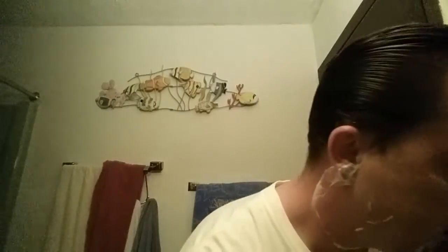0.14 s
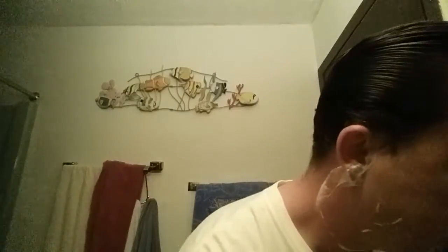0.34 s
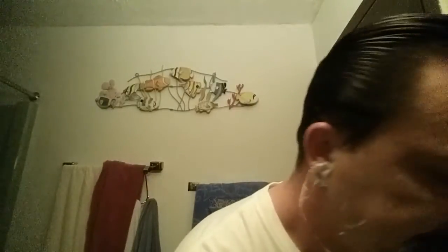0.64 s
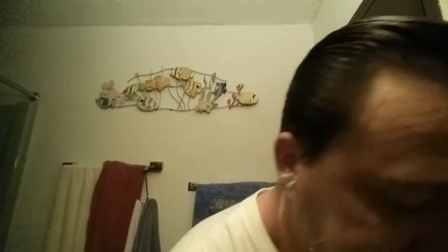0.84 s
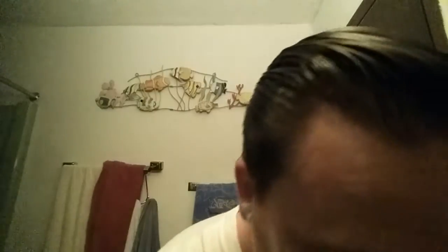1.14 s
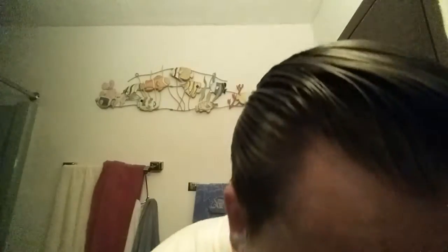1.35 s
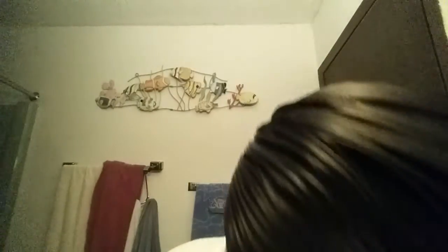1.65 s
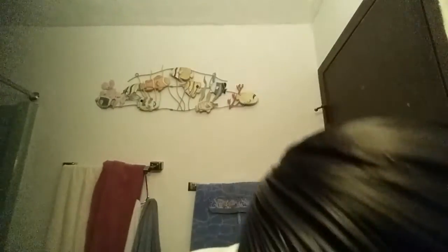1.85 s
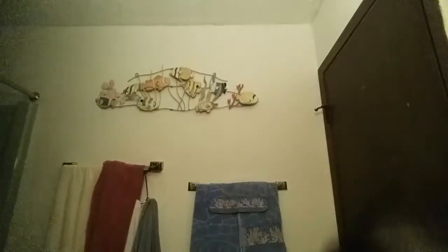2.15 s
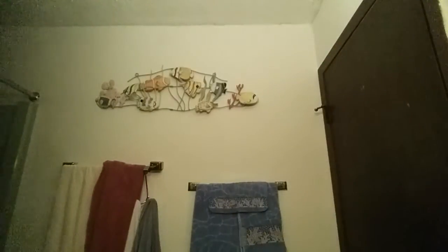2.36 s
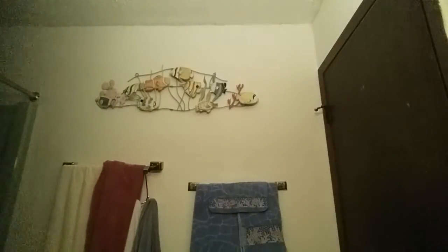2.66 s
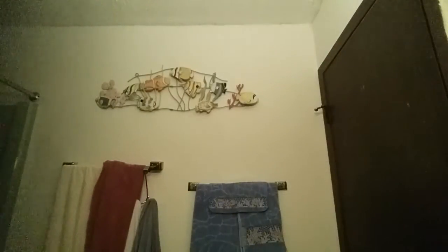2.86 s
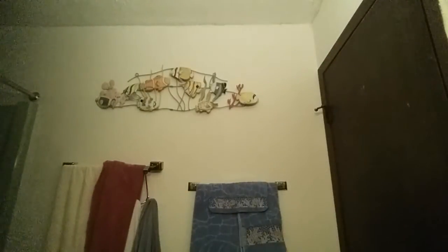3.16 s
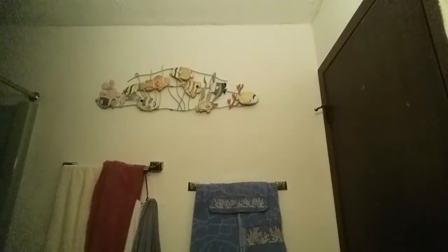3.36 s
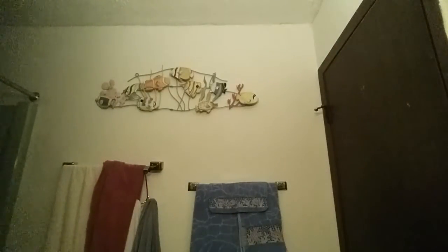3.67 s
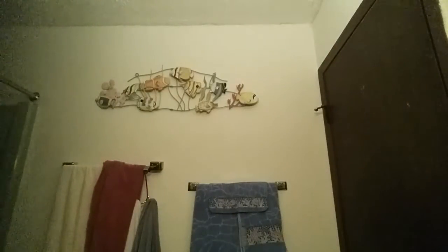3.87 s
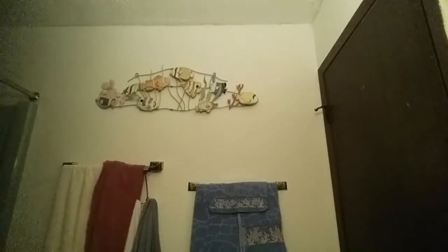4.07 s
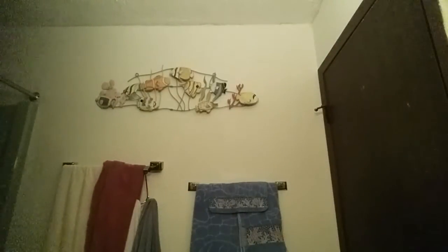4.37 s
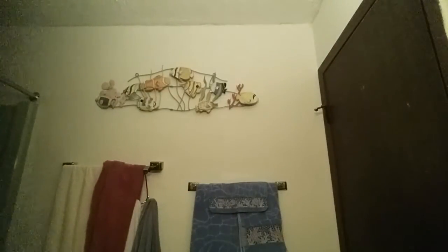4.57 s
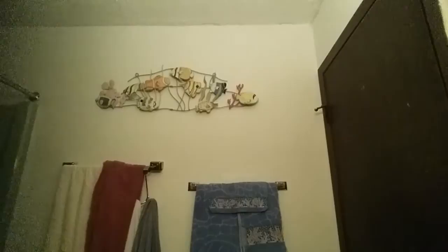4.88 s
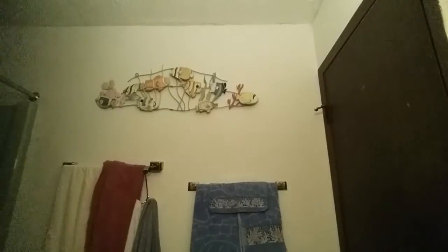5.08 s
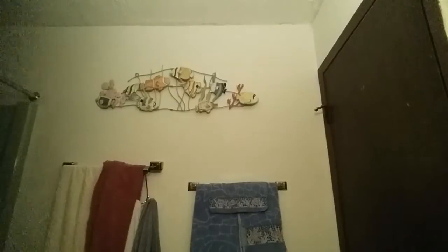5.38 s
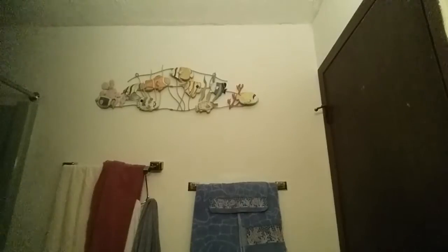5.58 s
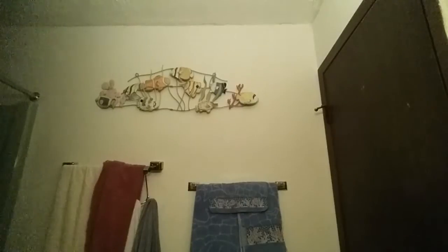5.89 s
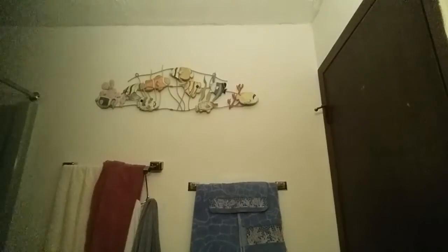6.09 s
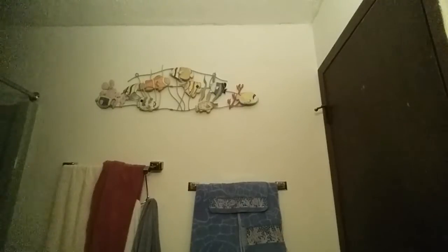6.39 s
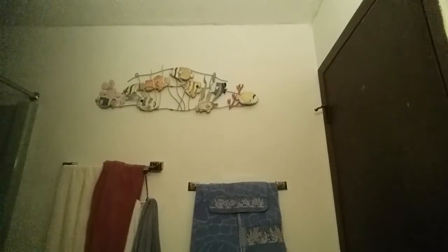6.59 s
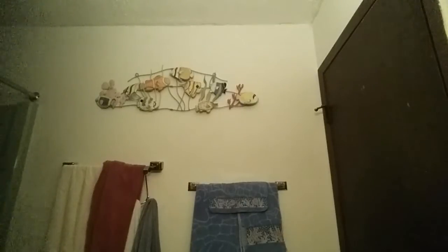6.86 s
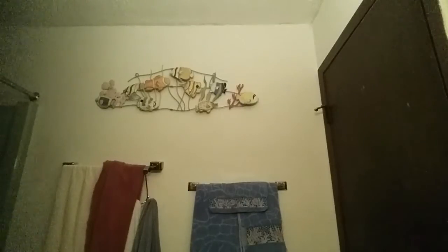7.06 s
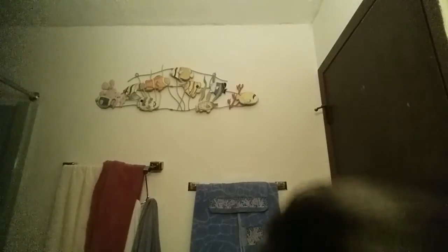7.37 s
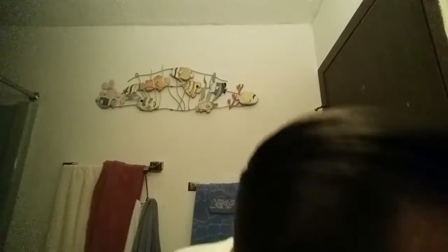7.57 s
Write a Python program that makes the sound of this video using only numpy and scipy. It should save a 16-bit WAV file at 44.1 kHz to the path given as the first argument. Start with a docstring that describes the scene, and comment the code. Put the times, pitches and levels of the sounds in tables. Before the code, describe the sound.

In a small tiled bathroom an extractor fan drones low and steadily. A thin tap hisses for the first second with small plops, then a razor raps sharply on the ceramic basin and rattles, the tap stops, and water splashes in quick bursts. A quiet gap, another short splash with a deep plop, sparse drips, and a final splash. Close stereo phone microphones, short bright echo.

```python
"""Rinsing a razor in a small tiled bathroom

An extractor fan drones in the room's standing waves: noise through narrow resonances, under a thin air rush.
A thin tap hisses until it is shut; a razor is knocked on the basin, rings and bounces: noise bursts and
damped sines. Water sloshes and splashes in the sink, bubbles plop and drops tick: noise and sines of climbing
pitch. All but the fan get a short bright echo of noise; two microphones at the ends of a phone hear it."""
import sys
import numpy as np
from scipy import signal
from scipy.fft import rfft, irfft, next_fast_len
from scipy.io import wavfile
from scipy.ndimage import map_coordinates

SR = 44100
rng = np.random.default_rng(int(sys.argv[2]) if len(sys.argv) > 2 else 0)


def unload_audio(sound):
    """Save the sound as a 16-bit wav file, at the path given as the first command line argument."""
    columns = np.transpose(np.atleast_2d(sound))
    # keep every value between -1 and 1, then stretch to whole-number steps
    steps = np.round(np.clip(columns, -1, 1) * 32767)
    wavfile.write(sys.argv[1], SR, steps.astype(np.int16))


def decibels_to_gain(level_db):
    """Convert a level in decibels to a linear amplitude gain (20 dB per decade)."""
    exponent = np.asarray(level_db, float) / 20
    return 10 ** exponent


N = 340893


def unit(x):
    """Scaled to rms 1."""
    return x / np.sqrt(np.mean(x ** 2) + 1e-20)


def along(points, hz):
    """(Hz, value) points read on a log frequency axis."""
    f, v = np.transpose(points)
    return np.interp(np.log(hz + 1), np.log(f + 1), v)


def wobble(rate):
    """A smooth random curve, rate knots a second."""
    knots = rng.standard_normal(int(N * rate / SR) + 4)
    return map_coordinates(knots, [np.arange(N) * rate / SR])


def filtered(x, response):
    """x through a complex response of frequency."""
    m = next_fast_len(N + SR // 2)
    return irfft(rfft(x, m) * response(np.fft.rfftfreq(m, 1 / SR)), m)[..., :N]


def resonance(f, hz, width_hz):
    """Causal response of one resonance, 1 at its top."""
    return 1j * f * width_hz / (hz * hz - f * f + 1j * f * width_hz)


def stereo(pair):
    """Two unrelated noises mixed to the likeness of the two microphones: the lower the pitch, the more alike."""
    # correlation between the microphones: f/Hz, likeness (1 = same, negative = opposed)
    likeness = [(40, 0.97), (100, 1), (300, 0.83), (500, 0.51), (750, -0.14), (1200, -0.13), (2000, -0.069)]

    def mid_side_gains(f):
        angle = np.arccos(np.clip(along(likeness, f), -1, 1)) / 2
        return np.array([np.cos(angle), np.sin(angle)])

    mid, side = filtered(pair, mid_side_gains)
    return np.array([mid + side, mid - side])


def bubbles(s, db, hz, cycles, rise):
    """Damped sines whose pitch climbs as each bubble nears the surface."""
    t = np.arange(SR // 25) / SR
    age = t * (hz / cycles)[:, None]  # in decay times, each of this many cycles
    cycles = np.reshape(cycles, (-1, 1))
    phase = 2 * np.pi * cycles * (age + rise * age ** 2 / 2)
    envelope = np.exp(-age) * (1 - np.exp(-age * cycles * 0.89))
    rows = decibels_to_gain(db)[:, None] * envelope * np.sin(phase)
    at = np.round(s * SR).astype(int)[:, None] + np.arange(len(t))
    return np.bincount(at.ravel(), rows.ravel(), N + SR)[:N]


def fan():
    """Turbulent air drives each standing wave on its own; a low rumble lies below, a thin rush and hiss above."""
    # standing waves: f/Hz, width/Hz, left level/dB, right level/dB, polarity of the right microphone
    room_modes = [(95.2, 26.4, -42, -77, 1), (108.3, 10.2, -45, -34, -1), (130, 13.4, -43, -40.5, 1),
                  (172.8, 11.2, -40, -43, -1), (199, 13.7, -41, -44.5, -1), (220, 13.1, -44, -64.5, 1),
                  (251, 22.5, -62, -48, 1), (287.9, 40.3, -51.5, -45.5, 1), (330.8, 17.5, -48.5, -50, 1),
                  (392.7, 15, -51.5, -55.5, 1), (437.7, 22.4, -69, -54, 1), (481.6, 11.9, -57, -59.5, 1),
                  (514.6, 59, -57.5, -63, 1)]
    # air rush and hiss: f/Hz, relative level/dB per Hz
    air_spectrum = [(330, -56), (560, -3.5), (809, -5), (878, -7), (1030, -13), (1410, -23), (2250, -19.5),
                    (2680, -27.5), (5750, -32.5), (9640, -37.5), (12100, -27.5), (14500, -29)]
    drone = np.zeros((2, N))
    for hz, width_hz, left_db, right_db, sign in room_modes:
        mode = lambda f: resonance(f, hz, width_hz) * resonance(f, hz, 3 * width_hz)
        wave = unit(filtered(rng.standard_normal(N), mode))
        drone += decibels_to_gain([[left_db], [right_db]]) * [[1], [np.sign(sign)]] * wave
    rumble = unit(filtered(rng.standard_normal(N), lambda f: resonance(f, 30, 50) ** 2))
    air = filtered(rng.standard_normal((2, N)), lambda f: decibels_to_gain(along(air_spectrum, f)))
    air_level = decibels_to_gain(-61 + 0.43 * wobble(3.28))
    return drone + decibels_to_gain(-51.0) * rumble + air_level * unit(stereo(air))


def tap():
    """The thin stream hisses in the resonances of spout and basin until the tap is shut."""
    # resonances of spout and basin: f/Hz, width/Hz, relative level/dB
    spout_modes = [(1300, 126, 6.5), (2150, 360, -1), (2750, 190, 1), (3400, 2500, -8), (860, 75, 3)]
    level_db, shut_s = -64, 1.05

    def spout(f):
        total = 0
        for k, (hz, width_hz, db) in enumerate(sorted(spout_modes)):
            total = total + (-1) ** k * decibels_to_gain(db) * resonance(f, hz, width_hz)  # neighbours alternate in sign
        return total

    turbulence = rng.standard_normal(N) * decibels_to_gain(1.7 * wobble(58.7))
    stream = unit(filtered(turbulence, spout))
    waver = decibels_to_gain(1.5 * wobble(6))
    return decibels_to_gain(level_db) * waver * stream * (np.arange(N) / SR < shut_s)


def splashes(s, hold_s, db, fall_db_per_s):
    """Level curve: each splash rises fast, holds, falls away and leaves a trickle; their powers add."""
    rise_s, trickle_db, trickle_fall_db_per_s = 0.0024, -23, 10.5
    hop = 32  # samples between points of the curve
    age = np.arange(0, N + hop, hop) / SR - s[:, None]
    over = np.maximum(age - hold_s[:, None], 0)
    shape = decibels_to_gain(-fall_db_per_s * over) + decibels_to_gain(trickle_db - trickle_fall_db_per_s * over)
    gain = decibels_to_gain(db)[:, None] * np.clip(age / rise_s, 0, 1) * shape
    return np.interp(np.arange(N) / hop, np.arange(gain.shape[1]), np.linalg.norm(gain, axis=0))


def water():
    """Slosh is noise full of random bubbles, spray is hiss made of tiny impacts; both come in quick gushes."""
    # splashes of the rinsing hand and water shaken off the razor:
    # t/s, hold/s, slosh level/dB, spray level/dB
    splash_list = [(0.045, 0.053, -60, -67.5), (0.262, 0.028, -81, -61.5), (0.572, 0.052, -57, -62),
                   (1.105, 0.017, -45, -51.5), (1.544, 0.0095, -48.5, -56), (1.65, 0.018, -62, -63),
                   (1.68, 0.018, -51.5, -54), (1.767, 0.024, -68, -57), (1.796, 0.035, -51, -48),
                   (1.904, 0.024, -59, -58), (1.98, 0.093, -61.5, -64), (2.096, 0.049, -54.5, -53.5),
                   (2.212, 0.15, -58.5, -57), (2.334, 0.035, -56.5, -54.5), (2.446, 0.028, -56.5, -62),
                   (2.482, 0.0088, -56.5, -50.5), (4.524, 0.052, -53, -52), (4.547, 0.042, -58, -49.5),
                   (4.68, 0.021, -64, -59), (4.822, 0.047, -62, -60.5), (4.904, 0.014, -58.5, -61.5),
                   (5.038, 0.065, -73, -66), (7.512, 0.013, -54, -51), (7.533, 0.011, -60, -47),
                   (7.694, 0.037, -64, -53.5)]
    # spectrum of the wash: f/Hz, relative level/dB per Hz
    slosh_spectrum = [(350, -23), (600, -13), (721, 8), (1170, -2.5), (1680, -13), (1850, 4.5), (6000, -43),
                      (7800, -51), (13200, -120)]
    # spectrum of the spray: f/Hz, relative level/dB per Hz
    spray_spectrum = [(2500, -24), (3500, -2.5), (5570, -3.5), (6770, -0.5), (10000, -4.5), (12300, 0),
                      (14500, -4)]
    s, hold_s, slosh_db, spray_db = np.transpose(splash_list)

    count = 5000
    when = rng.random(count) * N / SR
    size = rng.exponential(1, count)
    pitch = rng.standard_normal(count)
    fizz = unit(bubbles(when, 3.3 * size, 2300 * np.exp(.45 * pitch), cycles=4.5, rise=.1))
    wash = unit(filtered(rng.standard_normal(N), lambda f: decibels_to_gain(along(slosh_spectrum, f))))
    gushes = decibels_to_gain(2.8 * wobble(60))
    slosh = unit(gushes * (0.5 * wash + 0.96 * fizz))

    impacts = rng.standard_normal(N) * decibels_to_gain(5 * wobble(400) + 1.5 * wobble(50))
    spray = unit(filtered(impacts, lambda f: decibels_to_gain(along(spray_spectrum, f))))
    slosh_level = splashes(s, hold_s, slosh_db, fall_db_per_s=182)
    spray_level = splashes(s, hold_s, spray_db, fall_db_per_s=265)
    return slosh_level * slosh + spray_level * spray


def drops():
    """A drop's bubble rings and a second one follows; spatters are short puffs of noise around their pitch."""
    # single bubbles and drips: t/s, level/dB, f/Hz
    plops = [(.0508, -41, 3430), (.085, -44, 1005), (.105, -43, 1020), (.125, -38, 725), (.175, -32.5, 780),
             (0.2665, -39.5, 3270), (1.534, -47, 1700), (1.548, -32, 843), (1.549, -35.5, 2640),
             (1.597, -31.5, 1820), (1.608, -32, 740), (1.632, -42, 1600), (1.738, -39.5, 813),
             (1.79, -35.5, 1900), (1.828, -41, 2150), (1.879, -34.5, 2730), (1.912, -40, 1860),
             (2.068, -43.5, 1530), (2.102, -34, 2750), (2.145, -30, 1820), (2.217, -44, 815),
             (2.274, -32, 2140), (2.299, -37, 703), (2.3321, -33.5, 3290), (2.352, -37, 2200),
             (2.415, -45.5, 1685), (2.477, -37, 2020), (2.4838, -38, 2900), (2.57, -43, 867),
             (3.6388, -54.5, 1670), (3.7334, -51.5, 3200), (4.1011, -54, 4000), (4.527, -40.5, 905),
             (4.5523, -29, 3550), (4.569, -39.5, 2100), (4.612, -23.5, 687), (4.7057, -37.5, 3900),
             (4.777, -46.5, 1210), (4.784, -42, 3400), (4.797, -42.5, 3000), (4.849, -36.5, 2070),
             (4.849, -37, 1560), (5.0678, -42, 4100), (5.521, -51, 1700), (5.7005, -58, 3900),
             (6.609, -42, 1880), (6.715, -55.5, 1920), (7.541, -38, 2060), (7.662, -38, 2190),
             (7.708, -33, 3300), (7.708, -24.5, 2420)]
    # small bright spatters: t/s, level/dB, f/Hz
    ticks = [(0.144, -47.5, 12300), (1.467, -55, 4470), (1.694, -36, 6460), (1.717, -43, 12400),
             (2.1169, -40, 8400), (2.4014, -43, 12100), (3.075, -46.5, 8100), (3.225, -54.5, 12900),
             (4.387, -52, 12400), (5.135, -46.5, 12700), (6.468, -52.5, 11900), (6.547, -51, 12500),
             (6.5975, -48.5, 12200), (7.512, -38.5, 12300)]
    second_db, latest_s = -7, .018  # the bubble that follows each plop
    s, db, hz = np.transpose(plops)
    late, higher = rng.random((len(s), 2)).T
    ring = bubbles(s, db, hz, cycles=5.5 * np.minimum(1, 2400 / hz), rise=0.05)
    second_hz = hz * (0.95 + 0.2 * higher)
    second = bubbles(s + latest_s * late, db + second_db, second_hz, cycles=4.5, rise=0.08)
    sound = np.pad(ring + second, (0, SR))

    t = np.arange(SR // 20) / SR
    f = np.fft.rfftfreq(len(t), 1 / SR)
    for s, db, hz in ticks:
        colour = 0.11 + resonance(f, hz, 0.093 * hz)
        puff = irfft(rfft(rng.standard_normal(len(t))) * colour, len(t))
        sound[round(s * SR):][:len(t)] += decibels_to_gain(db - 60 * t / 0.017) * unit(puff)  # 60 dB down in 17 ms
    return sound[:N]


def razor():
    """Each blow cracks on the ceramic and leaves loose parts rattling; returns these and the blows' duller body."""
    # blows on the basin: t/s, crack level/dB, rattle level/dB, thud level/dB, thud f/Hz
    knocks = [(0.619, -40, -56, -33, 310), (0.802, -33, -46, -16.5, 130), (.832, -13.5, -64, -19, 303),
              (0.852, -7, -38, -17.5, 240), (1.0994, -7, -27.5, -19.5, 272), (1.1437, -17, -42, -29, 250),
              (1.843, -27, -54, -20, 365), (1.862, -45, -73, -29, 330)]
    # the razor head bounces to rest: t/s, level/dB
    bounces = [(1.1438, -26), (1.1722, -29), (1.192, -32)]
    # a hard blow sets the blade ringing: t/s, level/dB, f/Hz, t60/s
    blade = (1.102, -50, 13362, 0.5)
    # ceramic clack: f/Hz, gain/dB
    basin_spectrum = [(290, 8), (500, 8.5), (997, -3), (1850, -8.5), (2050, -6), (2600, -9.5),
                      (5970, -19.5), (13700, -20.5), (14500, -34)]
    clack, body = np.zeros((2, N + SR))
    t = np.arange(SR // 2) / SR
    chatter = decibels_to_gain(5 * wobble(250))
    for s, crack_db, rattle_db, thud_db, hz in knocks:
        at = round(s * SR)
        crack = decibels_to_gain(crack_db - 60 * t / .003)
        rattle = decibels_to_gain(rattle_db - 60 * (t / 0.29) ** 1.46) * chatter[at:at + len(t)]  # settles ever faster
        clack[at:][:len(t)] += (crack + rattle) * rng.standard_normal(len(t))
        envelope = np.exp(-t * hz / 0.98) * (1 - np.exp(-t / 0.00011))
        thud = decibels_to_gain(thud_db) * envelope * np.sin(2 * np.pi * hz * t)  # the counter booms
        body[at:][:len(t)] += thud
    for s, db in bounces:
        body[round(s * SR):][:len(t)] += decibels_to_gain(db - 60 * t / .005) * np.sin(2 * np.pi * 4700 * t)
    s, db, hz, t60 = blade
    body[round(s * SR):][:len(t)] += decibels_to_gain(db - 60 * t / t60) * np.sin(2 * np.pi * hz * t)
    return filtered(clack[:N], lambda f: decibels_to_gain(along(basin_spectrum, f))), body[:N]


def tiles(x, wet_db, bowl_db):
    """Direct sound, the bowl's quick answer and the tiles' echo; sources move, so each piece gets a new tail."""
    # echo of the tiled room: f/Hz, t60/s
    tile_decay = [(150, 0.54), (400, 0.78), (700, 0.2), (2000, 0.42), (5000, 0.28), (12000, 0.36)]
    bowl_t60_s = 0.041
    step, gap = SR // 5, 40  # samples: length of a piece, delay of the echo
    out = np.zeros((2, N + SR))
    for at in range(0, N, step):
        piece = x[at:at + step]
        if not piece.any():
            continue
        hz, t, z = signal.stft(rng.standard_normal((2, SR // 2)), SR, nperseg=256)
        decay = decibels_to_gain(-60 * t / along(tile_decay, hz)[:, None]) + decibels_to_gain(bowl_db - 60 * t / bowl_t60_s)
        tail = signal.istft(z * decay, SR, nperseg=256)[1]
        echo = signal.fftconvolve(piece[None], tail / np.linalg.norm(tail[0]), axes=1)
        out[:, at + gap:at + gap + echo.shape[1]] += echo
    # the path to the right microphone wanders by a few samples
    right = map_coordinates(x, [np.arange(N) - 3 * wobble(2)], order=3)
    return np.array([x, right]) + decibels_to_gain(wet_db) * stereo(out[:, :N])


def scene():
    """Water splashes deep in the bowl, the razor strikes its rim; both sound in the tiled room, over the fan."""
    clack, body = razor()
    wet = tiles(tap() + water(), wet_db=2.5, bowl_db=-1)
    wet = wet + tiles(drops(), wet_db=3.5, bowl_db=5)
    rim = tiles(clack, wet_db=3.5, bowl_db=9.0) + tiles(body, wet_db=2.0, bowl_db=7.0)
    return wet + rim + fan()


def band_limit(x):
    """A steep low-pass at the top of the band."""
    return signal.sosfilt(signal.butter(12, 15480, fs=SR, output="sos"), x)


def record(dry):
    """The phone body shades each microphone by pitch, the ports dip near 6 kHz and both ends are cut."""
    # balance of the microphones: f/Hz, left minus right/dB
    balance = [(560, 1), (940, 5), (1880, 4.5), (3750, 0), (7470, 1.5), (10500, 1), (12500, -5.5)]

    def microphones(f):
        shading = decibels_to_gain(along(balance, f) * np.array([[.5], [-.5]]))
        port = 1 - 0.67 * resonance(f, 6160, 920)
        top_cut = 1 + (f / 14550) ** 200
        low_cut = 1 + (55 / (f + 1)) ** 3
        return shading * port / top_cut / low_cut

    mix = filtered(dry, microphones)
    return band_limit(mix)


dry = scene()
out = record(dry)
unload_audio(out)
```